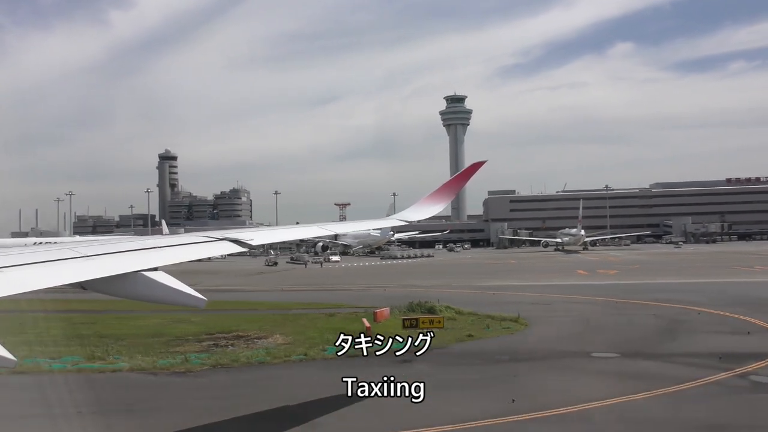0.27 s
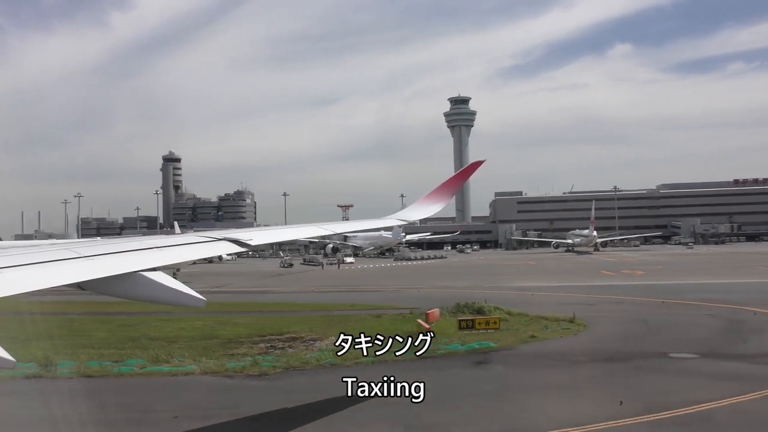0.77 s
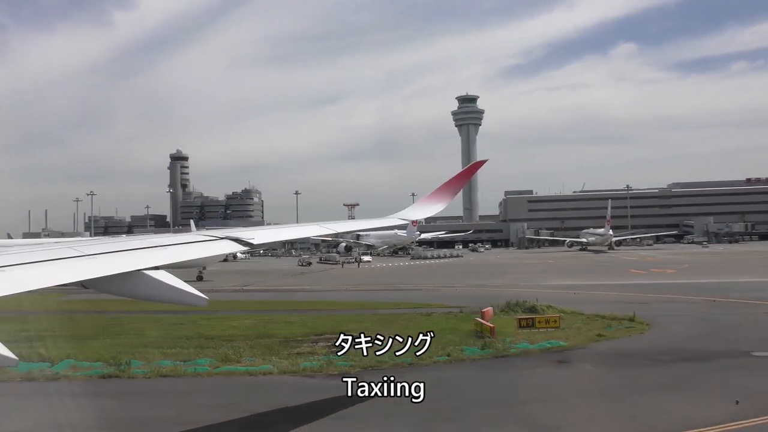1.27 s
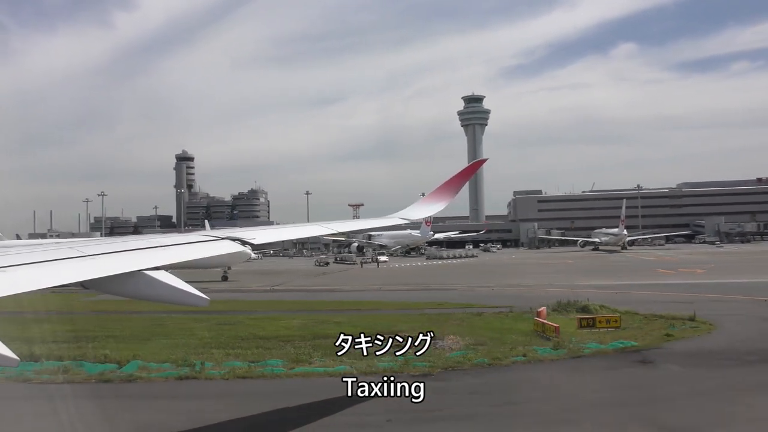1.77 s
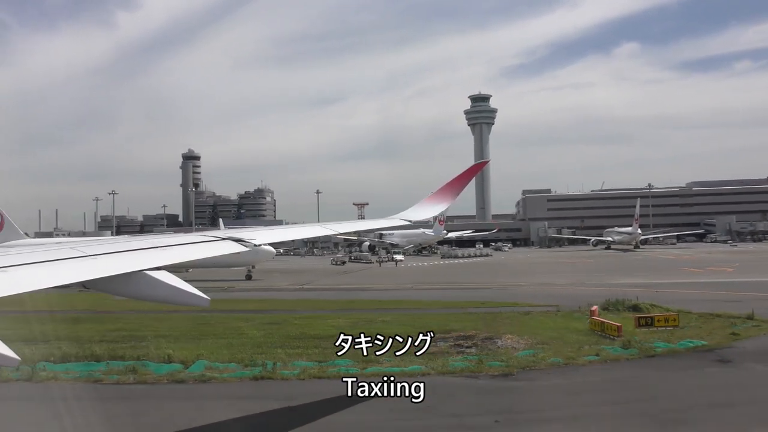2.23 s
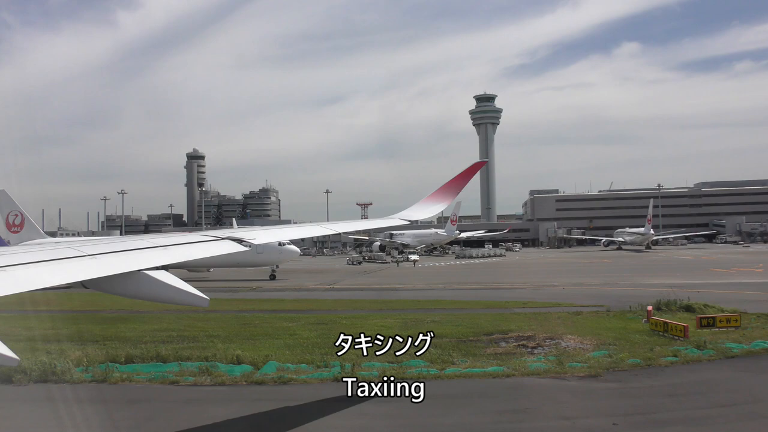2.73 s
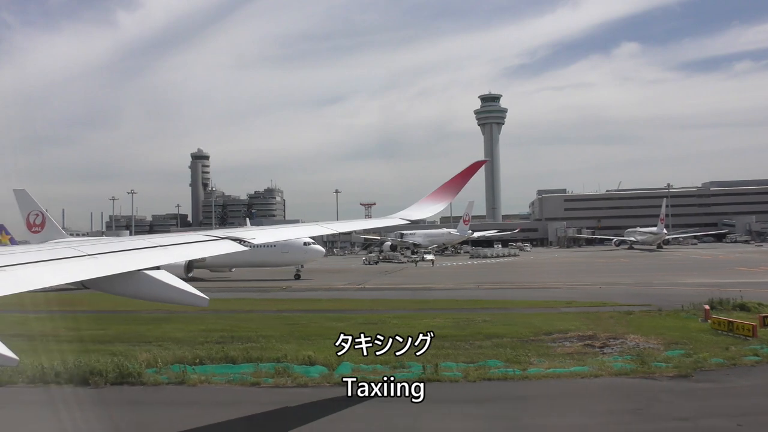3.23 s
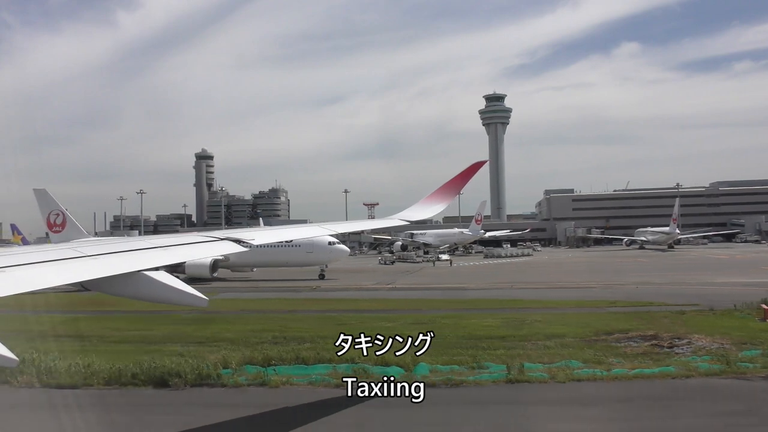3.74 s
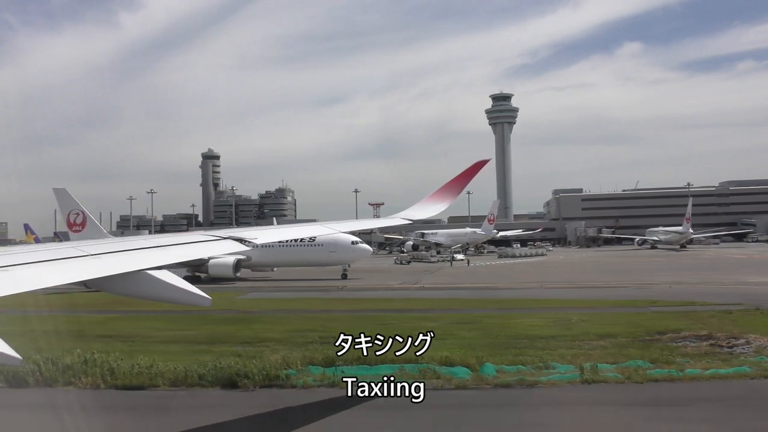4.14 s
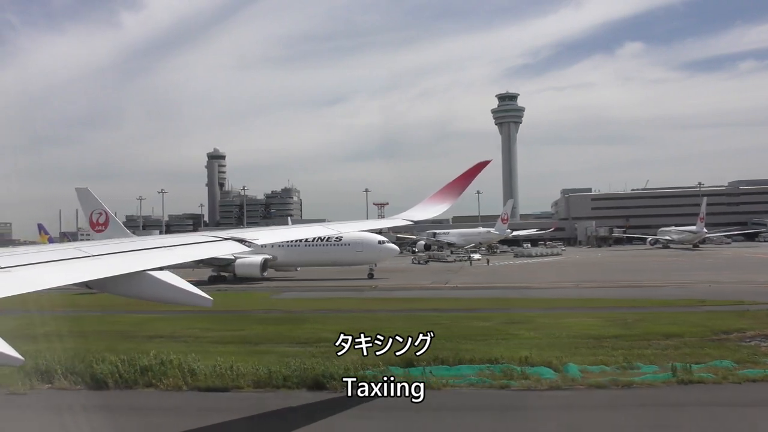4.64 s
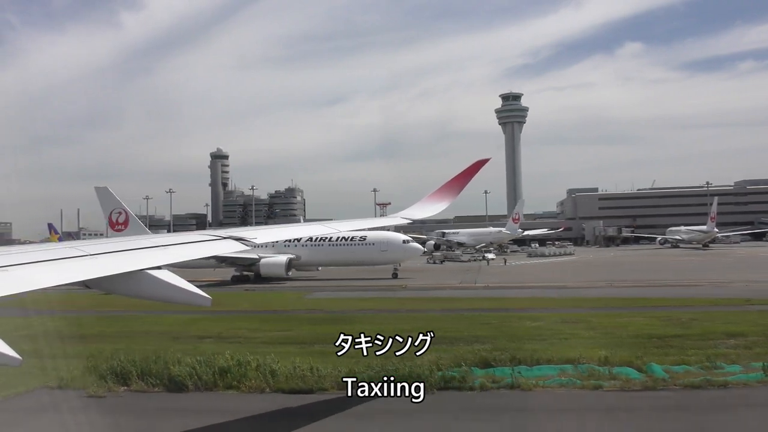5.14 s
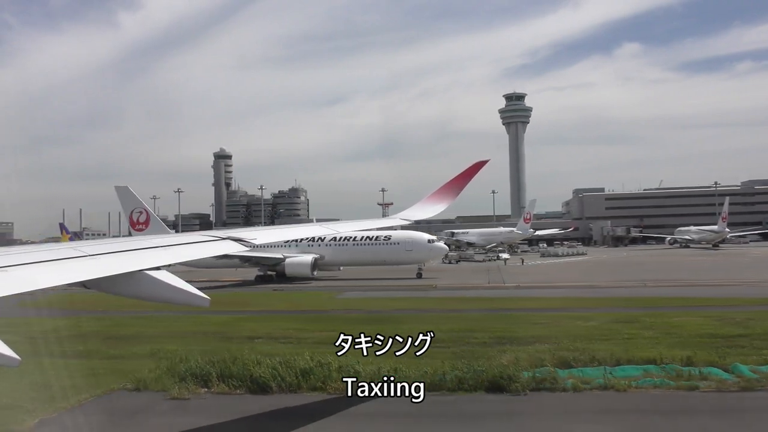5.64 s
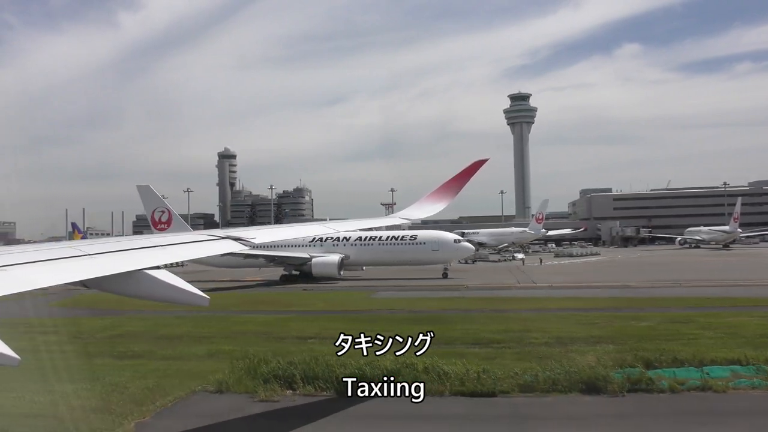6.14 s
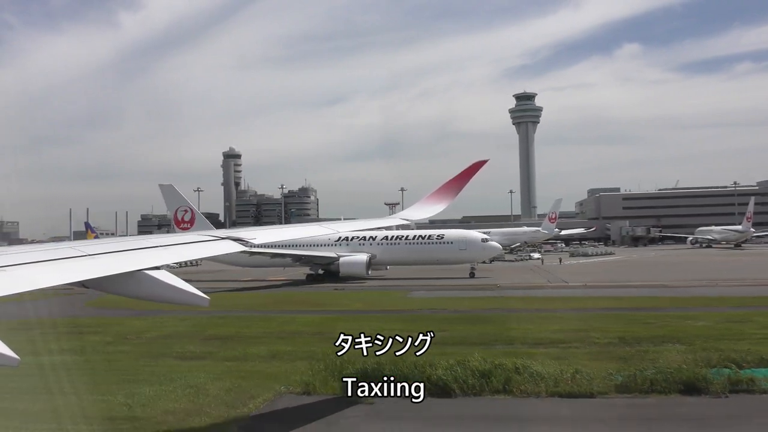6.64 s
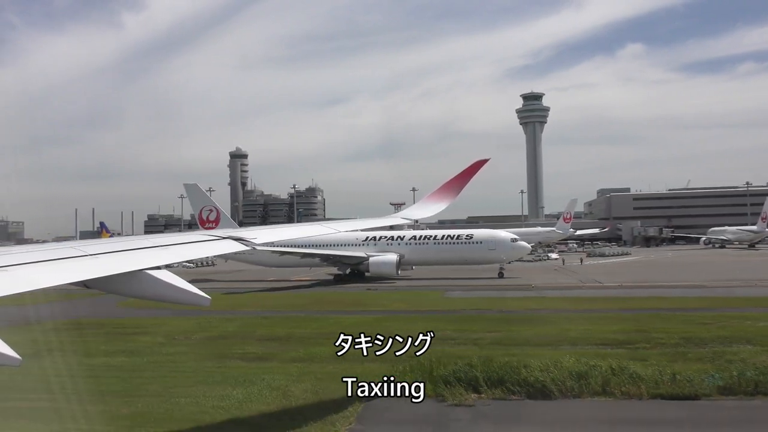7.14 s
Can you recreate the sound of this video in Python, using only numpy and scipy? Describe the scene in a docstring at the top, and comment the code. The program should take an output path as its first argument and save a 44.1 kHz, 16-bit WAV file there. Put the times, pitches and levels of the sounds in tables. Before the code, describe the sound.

Inside a passenger jet rolling along a taxiway, a deep, droning engine boom fills the cabin over uneven wheel rumble, with a soft low bump near the start. A faint steady hum slowly beats beneath vent hiss. Close to the window-seat stereo microphone, cloth swishes early, then small ticks and dull panel taps cluster around the middle, with light floor thuds later and more rustling and ticking to the end.

```python
"""Cabin of a jet airliner rolling slowly along a taxiway, heard by two close capsules at a window seat.
Idling engines and wheels shake the hull: filtered noise rings the cabin's resonances and the landing gear.
Two sine hums from pumps beat over a weak whirr of narrow noise; vents hiss, a thin whistle comes and goes.
Close by, shaped noise makes the cloth rustle and swish and small things tick; trim panels knock,
the floor thuds and a buckle clinks as sets of decaying sine modes."""
import sys
import numpy as np
from scipy import signal
from scipy.fft import rfft, irfft
from scipy.io import wavfile
from scipy.ndimage import uniform_filter1d

SR = 44100
rng = np.random.default_rng(int(sys.argv[2]) if len(sys.argv) > 2 else 0)


def store_wav(level_fs):
    """Save 16-bit WAV to argv[1]."""
    pcm = np.round(np.clip(np.atleast_2d(level_fs), -1, 1) * 32767)
    wavfile.write(sys.argv[1], SR, pcm.T.astype(np.int16))


N = 326340  # length in samples

# All source levels are set ahead of the microphone response and output gain.
# Vents and far jet roar, relative spectrum: pitch_hz [Hz], level_db [dB per Hz]
AIR_SPECTRUM = [(29, -48.5), (50, -14), (187, -7), (232, -10), (349, -29.5), (434, -25.5), (513, -26),
                (607, -29), (1050, -34), (1440, -33.5), (1660, -38), (2620, -42.5), (15500, -79.5)]
AIR_DB = -33  # rms, before swelling and flicker

# Swells of the thin whistle: peak_s [s], rise_db [dB], half_length_s [s]
WHISTLE_SWELLS_OVER_TIME = [(.5, 6, .5), (2.35, 9, 0.28), (5.3, 3, .2)]
WHISTLE_HZ, WHISTLE_WIDTH_HZ = 11650, 400  # width of each of two passes
WHISTLE_DB = -89  # rms between swells

# Drawn level of a weak narrow noise near 610 Hz: time_s [s], level_db [dB rms before patchiness]
WHIRR_LEVEL = [(0, -51), (.4, -58), (.8, -51.5), (2.3, -53), (2.7, -56), (3.5, -53), (4.4, -50), (5.1, -56),
               (5.5, -51), (6.2, -55), (6.8, -53), (7.4, -54)]
WHIRR_HZ, WHIRR_WIDTH_HZ = 610, 30  # width of each of two passes
WHIRR_PATCHY_DB = 1.8  # rms spread

# Speed lead of the second pump: time_s [s], pitch_above_first_hz [Hz]
PUMP_BEAT = [(0, .85), (1.2, .8), (2.6, .67), (3.9, .83), (7.4, 1.0)]
PUMP_HZ, IN_STEP_S = 434.68, 3.29  # first pump's pitch; a moment when both are in step
PUMP_DB, SECOND_PUMP_DB = -45, -51.5  # rms of each fundamental

# Level of the restless cloth and paper: time_s [s], level_db [dB rms before crackle and flicker]
RUSTLE_LEVEL = [(0, -64.5), (.6, -62), (1.2, -64), (2.3, -60.5), (3.6, -61.5), (4.1, -64.5), (4.6, -59.5),
                (5.0, -61.5), (5.85, -62.5), (6.2, -60.5), (7.4, -62.5)]
# Rustle, relative spectrum: pitch_hz [Hz], level_db [dB per Hz]
RUSTLE_SPECTRUM = [(1000, -8.5), (2000, 3), (4000, -1), (7000, -7.5), (11500, -6.5), (15500, -11.5)]

# Cloth swept across a seat: peak_s [s], level_db [dB], half_length_s [s],
# fine_weave_share [0-1], hollow_level_db [dB relative to the hiss]
CLOTH_SWEEPS = [(0.381, -45, 0.054, 0.33, -8), (0.981, -41.5, 0.044, 0.18, -5), (1.02, -58, 0.018, 0.3, 9),
                (2.45, -56.5, 0.058, .45, 3), (2.552, -52, 0.043, 0, -18), (3.2, -54.5, 0.036, 0.1, 2),
                (3.91, -55.5, 0.035, 0.9, -12), (4.693, -63, .04, 1, -12), (4.864, -50, 0.026, 0, 0),
                (5.508, -54.5, 0.068, 0.1, -14), (6.508, -53.5, 0.047, 0.9, -12),
                (6.814, -52, 0.018, .05, -1), (6.922, -52.5, 0.026, 0, -3)]
# Duller cloth hiss, relative spectrum: pitch_hz [Hz], level_db [dB per Hz]
SWEEP_SPECTRUM = [(700, -7.5), (1100, 0.5), (1400, -5.5), (1650, -1.5), (1900, -2.5), (2300, 2), (2650, 1),
                  (2900, -4), (3300, -3.5), (4100, -9.5), (5000, -11.5), (7700, -17.5), (10000, -23),
                  (15500, -34.5)]
HOLLOW_HZ, HOLLOW_WIDTH_HZ = 1445, 90  # width of each of two passes
SWELL_SHAPE = 1.45  # exponent under 2: pointed peak, long shoulders

# Buckles, paper and clips: start_s [s], snap_level_db [dB before rise and decay],
# body_level_db [dB relative to the snap]
TICK_EVENTS = [(0.6858, -55.5, 5), (0.7906, -55, 5), (1.129, -43, -10), (1.142, -56, -2), (1.207, -64, 7),
               (1.272, -58, -4), (1.3783, -52, -10), (1.482, -57, -6), (1.515, -57, 8), (1.4157, -53.5, -1),
               (2.4029, -54, -9), (2.4374, -54, 4), (2.6994, -56, 2), (2.8275, -56, 8), (2.9198, -48.5, -3),
               (2.9881, -54, 7), (3.124, -48, 9), (3.132, -51, 5), (3.1685, -47.5, 2), (3.2025, -59, 5),
               (3.24, -65, 16), (3.2684, -62, 16.5), (3.301, -60, 5), (3.3458, -54, 1), (3.5384, -53.5, 7),
               (4.4388, -54, 5), (4.8494, -59, 4), (5.012, -51, 3), (5.0894, -53, .4), (5.7029, -53, 1),
               (5.875, -54, -9), (6.0132, -53, -12), (6.099, -53, .4), (6.187, -53, -6), (6.2093, -58, .4),
               (6.2306, -48, -2), (6.292, -58, 2), (6.352, -65, 14), (6.46, -60, 8), (6.5134, -51, -5),
               (6.697, -59, 3), (6.912, -58, -1), (7.0194, -53, .4), (7.223, -52, -2.5)]
# Bright snap, relative spectrum: pitch_hz [Hz], level_db [dB per Hz]
SNAP_SPECTRUM = [(2000, -33), (4800, -18), (5600, -5.5), (6300, -4), (7200, -2), (8100, 1), (9000, -2),
                 (10200, -1.5), (11700, -4.5), (13000, -7.5), (15500, -18)]
# Duller body, relative spectrum: pitch_hz [Hz], level_db [dB per Hz]
BODY_SPECTRUM = [(800, -15), (1300, -1), (2000, 2.5), (2700, 1.5), (3150, 0.5), (3600, -5), (4400, -6.5),
                 (5400, -7), (6500, -12), (10000, -34)]
SNAP_T60_S, BODY_T60_S, TICK_RISE_S = 0.052, 0.11, 0.0034

# Taps of loose trim panels: start_s [s], level_db [dB peak]
PANEL_KNOCKS = [(0.4722, -36), (0.5706, -42), (0.6002, -40), (1.5484, -42), (1.9755, -39), (2.5466, -31.5),
                (3.1245, -34), (3.133, -34), (3.268, -38), (3.2994, -38.5), (3.702, -35.5), (3.828, -33.5),
                (3.9338, -33), (4.3236, -38.5), (4.4618, -34.5), (4.5485, -38), (4.7793, -35),
                (5.0654, -38), (5.1652, -37), (5.5475, -35), (6.7615, -40), (6.8074, -36.5)]
# Panel modes: pitch_hz [Hz], level_db [dB, relative], t60_s [s]
PANEL_MODES = [(880, -11, .04), (1110, -5, .045), (1310, -2, .04), (1450, -3, .04), (1590, 0, .04),
               (1890, -8, .035), (2110, -9, .035), (2790, -14, .03), (3700, -20, .03)]
# Floor blows: start_s [s], level_db [dB peak]
FLOOR_THUDS = [(4.845, -34), (4.873, -35.5), (6.824, -39)]
# Floor modes: pitch_hz [Hz], level_db [dB, relative], t60_s [s]
FLOOR_MODES = [(512, -6, 0.11), (624, 4, .12), (766, -11, 0.117), (974, -8, 0.076)]
# Buckle blows: start_s [s], level_db [dB peak]
BUCKLE_CLINKS = [(3.125, -52), (3.1675, -55), (3.2, -49)]
# Buckle modes: pitch_hz [Hz], level_db [dB, relative], t60_s [s]
BUCKLE_MODES = [(5250, -4, .05), (5750, 0, .05), (8200, -2, .04), (11600, -6, .04), (11850, -5, .045)]

# Level of the rolling: time_s [s], level_db [dB rms of the gear before the paving's lumps]
ROLL_LEVEL = [(0, -42), (1.2, -35.5), (2.4, -35.5), (3.2, -39), (5, -36.5), (5.7, -37.5), (7.4, -40)]
GEAR_HZ, GEAR_WIDTH_HZ = 35.6, 14  # width of each of two passes
LUMP_DB, LUMPS_PER_S = 2.8, 4  # rms spread and rate of the uneven paving
# One larger bump; its level is before rise and decay
BUMP_S, BUMP_DB, BUMP_HZ, BUMP_RISE_S, BUMP_T60_S = .24, -15, 43.9, 0.05, .9

# Cabin resonances: pitch_hz [Hz], width_hz [Hz], level_db [dB rms before waver]
CABIN_MODES = [(81.1, 18, -35.5), (128.1, 32.4, -29), (160.5, 7.2, -30), (166.6, 7.8, -32.5),
               (183.9, 22.7, -26.5), (204, 21, -34.5), (218.8, 13, -30.5), (235.4, 15, -32.5),
               (284.6, 33.3, -35), (315, 19, -45), (358.2, 23, -46.5), (397.5, 26, -46), (452.6, 36, -51.5),
               (573, 44, -57.5), (667, 61, -54), (863, 90, -56.5), (1230, 140, -64), (1378, 8, -68.5),
               (1422, 50, -61.5), (1463, 17, -67), (1506, 12, -70.5), (2606, 170, -68), (3206, 220, -69)]
# Bass of the boom, relative: time_s [s], deepest_level_db [dB], next_level_db [dB]
BOOM_BASS_LEVEL = [(0, 1.5, 0), (.4, 1, -1), (.8, 0, -2.5), (1.6, -0.5, 1), (2.4, 1.5, 0), (3.5, -.5, 0.5),
                   (4.4, 0.5, 0), (5.7, .5, -0.6), (6.4, 0, 0), (7.4, 0, -0.2)]
DEEP_UNDER_HZ, BASS_UNDER_HZ = 175, 270  # tops of the deepest modes and of those above them
BOOM_FLUTTER_DB, BOOM_FLUTTER_PER_S = .5, 12  # rms spread and rate

# The two capsules: pitch_hz [Hz], likeness [0-1], right_lead_rad [rad], left_minus_right_db [dB]
CAPSULE_PAIR = [(35, 1, 1.1, 5.5), (56, 0.97, 1.3, 3.5), (89, 1, 0.47, 5.5), (174, 0.95, 1.03, 0.4),
                (223, 0.99, 1.02, 2.5), (350, 0.69, 0.74, -7.5), (435, 0.6, 1.1, -9), (560, 0.34, 0.37, -2),
                (714, 0.62, 0.12, -5.5), (895, 0.4, -.9, -4), (1420, 0.72, -0.42, -1),
                (1800, 0.6, -1.1, -1.5), (2800, .62, -.37, .5), (4500, 0.55, 0.36, .6),
                (5700, 0.9, -.03, 1), (7200, 1, 0, 0), (9000, 0.9, 0, .6), (14300, 0.7, 0, .1)]
# Capsule hiss, relative spectrum: pitch_hz [Hz], level_db [dB per Hz]
SELF_NOISE_SPECTRUM = [(4000, -11.5), (9000, -0.5), (12500, -1.5), (15500, 0)]
SELF_NOISE_DB, TOP_HZ = -80, 15720  # rms before output gain; treble cutoff


def undb(db):
    """Amplitude gain of a level in dB."""
    return 10 ** (np.asarray(db) / 20)


def unit(x):
    """Scales x to rms 1."""
    return x / np.sqrt(np.mean(x ** 2))


def curve(table):
    """Columns of a time table, interpolated to one value per sample."""
    s, *columns = np.transpose(table)
    return [np.interp(np.arange(N) / SR, s, column) for column in columns]


def across(table, hz):
    """Columns of a frequency table read at hz on a log axis."""
    at, *columns = np.transpose(table)
    log_hz = np.log(np.maximum(hz, 1))
    return [np.interp(log_hz, np.log(at), column) for column in columns]


def shaped(x, gain):
    """Multiplies the spectrum of x by gain(Hz)."""
    return irfft(rfft(x) * gain(np.arange(N // 2 + 1) * SR / N), N)


def ring(x, hz, width_hz):
    """A resonance applied twice, so its skirts fall steeply."""
    def gain(f):
        detuning = (f ** 2 - hz ** 2) / (width_hz * np.maximum(f, 1))
        return 1 / (1 + detuning ** 2)
    return shaped(x, gain)


def walk(rate):
    """Random levels held 1 / rate seconds and smoothed twice; rms 1."""
    hold = int(SR / rate)
    steps = np.repeat(rng.standard_normal(N // hold + 1), hold)
    return unit(uniform_filter1d(uniform_filter1d(steps, hold), hold)[:N])


def noise():
    """Two unrelated noises: what both capsules share and what differs."""
    return rng.standard_normal((2, N))


def colour(table, tilt_db=0):
    """Noise above 500 Hz with a table's spectrum, tilted about 4 kHz by dB per octave."""
    def gain(f):
        tilt = tilt_db * np.log2(np.maximum(f, 1) / 4000)
        return undb(across(table, f)[0] + tilt) * (f > 500)
    return unit(shaped(noise(), gain))


def add(out, sound, s, db, t60, rise):
    """Adds into out a short stretch of sound from s, with a soft onset and exponential decay."""
    k = int(s * SR)
    t = np.arange(min(int(.15 * SR), N - k)) / SR
    envelope = undb(db - 60 * t / t60) * (1 - np.exp(-t / rise))
    out[:, k:k + len(t)] += envelope * sound[:, k:k + len(t)]


def strike(blows, modes, rise_s, spread_db, detune):
    """Each blow rings the same modes, a little differently weighted and tuned each time."""
    out = np.zeros((2, N))
    t = np.arange(SR // 5) / SR
    hz, mode_db, t60 = np.transpose(modes)[:, :, None]
    variations = rng.standard_normal((len(blows), 2, len(modes), 1))
    for (s, db), (weight, tune) in zip(blows, variations):
        decay = undb(mode_db + spread_db * weight - 60 * t / t60)
        rings = decay * np.sin(2 * np.pi * hz * (1 + detune * tune) * t)
        blow = rings.sum(axis=0) * (1 - np.exp(-t / rise_s))
        k = int(s * SR)
        out[0, k:k + len(t)] += undb(db) * blow / abs(blow).max()
    return out


def air():
    """Vents and far jet roar: broad hiss in octave bands that swell together and flicker alone."""
    hiss = unit(shaped(noise(), lambda f: undb(across(AIR_SPECTRUM, f)[0])))
    swell = walk(1.95)
    out = 0
    for octave in range(5, 15):  # overlapping bands centred on 2 ** octave Hz
        band = shaped(hiss, lambda f: np.clip(1 - abs(np.log2(np.maximum(f, 1)) - octave), 0, 1))
        out = out + band * undb(.5 * swell + 1.0 * walk(9))
    return undb(AIR_DB) * out


def whistle():
    """A narrow band of noise makes a thin high hiss that comes and goes."""
    t = np.arange(N) / SR
    rise_db = sum(db * np.exp(-((t - s) / half) ** 2) for s, db, half in WHISTLE_SWELLS_OVER_TIME)
    level = undb(WHISTLE_DB + rise_db + 1.5 * walk(10))
    return level * unit(ring(noise(), WHISTLE_HZ, WHISTLE_WIDTH_HZ))


def whirr():
    """A weak narrow-band whirr of noise, its level wandering irregularly."""
    level = undb(curve(WHIRR_LEVEL)[0] + WHIRR_PATCHY_DB * walk(6))
    return level * unit(ring(noise(), WHIRR_HZ, WHIRR_WIDTH_HZ))


def pumps():
    """Two pumps a little apart in speed: their hum beats slowly, with a faint octave."""
    def hum(phase):
        return np.sin(phase) + undb(-35.0) * np.sin(2 * phase)
    first = 2 * np.pi * PUMP_HZ * np.arange(N) / SR
    ahead = 2 * np.pi * np.cumsum(curve(PUMP_BEAT)[0]) / SR
    second = first + ahead - ahead[int(IN_STEP_S * SR)]
    tone = np.sqrt(2) * (undb(PUMP_DB) * hum(first) + undb(SECOND_PUMP_DB) * hum(second))
    return np.array([tone, 0 * tone])


def rustle():
    """Clothes and paper never quite rest: a patchy hiss with small crackles, its top flickering alone."""
    impulses = (rng.random(N) < 30 / SR) * rng.random(N) ** 2  # about 30 per second
    crackle = signal.lfilter([1], [1, -np.exp(-1 / (.005 * SR))], impulses)  # 5 ms decay
    crackle = uniform_filter1d(crackle, size=60)
    hiss = colour(RUSTLE_SPECTRUM)
    top = shaped(hiss, lambda f: np.clip((f - 8500) / 2500, 0, 1))
    hiss = (hiss - top) * undb(.9 * walk(25)) + top * undb(1.1 * walk(8))
    return undb(curve(RUSTLE_LEVEL)[0]) * (1 + 0.75 * crackle) * hiss


def swishes():
    """Each cloth sweep swells and fades, catching on the weave; some also ring a hollow under it."""
    dull = colour(SWEEP_SPECTRUM)
    bright = colour(SWEEP_SPECTRUM, tilt_db=7.0)
    hollow = unit(ring(noise(), HOLLOW_HZ, HOLLOW_WIDTH_HZ))
    t = np.arange(N) / SR
    out = 0
    for s, db, half, share, hollow_db in CLOTH_SWEEPS:
        swell = np.exp(-abs((t - s) / half) ** SWELL_SHAPE)
        hiss = np.sqrt(1 - share) * dull + np.sqrt(share) * bright
        out = out + undb(db) * swell * (hiss + undb(hollow_db) * hollow)
    return out * undb(1.8 * walk(90))  # roughness of the weave


def ticks():
    """Buckles, paper and plastic clips: a bright noise snap over a duller, longer body."""
    out = np.zeros((2, N))
    snap, body = colour(SNAP_SPECTRUM), colour(BODY_SPECTRUM)
    for s, db, body_db in TICK_EVENTS:
        add(out, snap, s, db, SNAP_T60_S, TICK_RISE_S)
        add(out, body, s, db + body_db, BODY_T60_S, TICK_RISE_S)
    return out


def knocks():
    """Loose trim panels tap their frames, the floor thuds, a metal buckle clinks: each rings its modes."""
    taps = strike(PANEL_KNOCKS, PANEL_MODES, rise_s=.0005, spread_db=1.5, detune=.012)
    thuds = strike(FLOOR_THUDS, FLOOR_MODES, rise_s=0.0033, spread_db=1, detune=0.025)
    clinks = strike(BUCKLE_CLINKS, BUCKLE_MODES, rise_s=.002, spread_db=0, detune=.004)
    return taps + thuds + clinks


def wheels():
    """Uneven paving shakes the gear at its bounce pitch and, fainter, the floor; one bump rings the gear."""
    gear = unit(ring(noise(), GEAR_HZ, GEAR_WIDTH_HZ))
    floor = undb(-8.0) * unit(ring(noise(), 76, 57))
    since = np.maximum(np.arange(N) / SR - BUMP_S, 0)
    bump_level = undb(BUMP_DB - 60 * since / BUMP_T60_S) * (1 - np.exp(-since / BUMP_RISE_S))
    bump = bump_level * np.sin(2 * np.pi * BUMP_HZ * since)
    rolling = undb(curve(ROLL_LEVEL)[0] + LUMP_DB * walk(LUMPS_PER_S)) * (gear + floor)
    return rolling + np.array([bump, 0 * bump])


def boom():
    """Broad engine noise rings the cabin; the bass flutters as one, and each mode wavers alone."""
    flutter_db = BOOM_FLUTTER_DB * walk(BOOM_FLUTTER_PER_S)
    deep, bass = (unit(undb(db + flutter_db)) for db in curve(BOOM_BASS_LEVEL))
    out = 0
    for hz, width_hz, db in CABIN_MODES:
        if hz < DEEP_UNDER_HZ:
            drive = deep
        elif hz < BASS_UNDER_HZ:
            drive = bass
        else:
            drive = 1
        waver_db = .3 if hz < 500 else 1.5
        mode = ring(noise(), hz, width_hz / np.sqrt(np.sqrt(2) - 1))  # widened, as two passes narrow it
        out = out + undb(db + waver_db * walk(3.98)) * unit(mode) * drive
    return out


def scene():
    """All sources, from the background to the boom, as a shared and a diffuse part."""
    background = air() + whistle() + whirr() + pumps()
    close = rustle() + swishes() + ticks() + knocks()
    return background + close + wheels() + boom()


def capsules(dry):
    """Two close capsules: bass arrives alike but shifted in phase, the middle range differs most."""
    margin = SR // 4
    wide = np.pad(dry, [(0, 0), (margin, margin)], "reflect")  # the sound goes on before and after
    size = wide.shape[1]
    like, lead, left_db = across(CAPSULE_PAIR, np.arange(size // 2 + 1) * SR / size)
    shared, diffuse = rfft(wide) * np.sqrt([1 + like, 1 - like])
    left = undb(left_db / 2) * np.exp(-.5j * lead)
    right = undb(-left_db / 2) * np.exp(.5j * lead)
    # dividing by the level of the capsules' mean keeps its spectrum true to the sources
    centre_power = abs(left + right) ** 2 * (1 + like) + abs(left - right) ** 2 * (1 - like)
    centre = np.sqrt(centre_power / 4)
    pair = irfft(np.array([left * (shared + diffuse), right * (shared - diffuse)]) / centre, size)
    return pair[:, margin:-margin]


def record(dry):
    """Capsules with their own hiss, a rumble cut, soft rounding of the loudest peaks and a treble cut."""
    lead = SR // 10
    x = capsules(dry) + colour(SELF_NOISE_SPECTRUM) * undb(SELF_NOISE_DB)
    # a lead-in lets the filters settle before the start
    x = np.pad(x, [(0, 0), (lead, 0)], "reflect", reflect_type="odd")
    x = signal.sosfilt(signal.butter(2, 24, "high", fs=SR, output="sos"), x)
    x = np.tanh(2.184 * x) / 2.0
    return signal.sosfilt(signal.ellip(14, .2, 70, TOP_HZ, fs=SR, output="sos"), x)[:, lead:]


dry = scene()
out = record(dry)
store_wav(out)
```